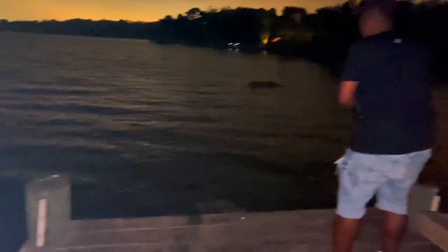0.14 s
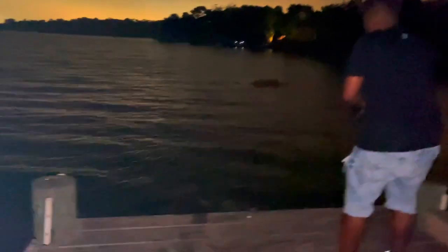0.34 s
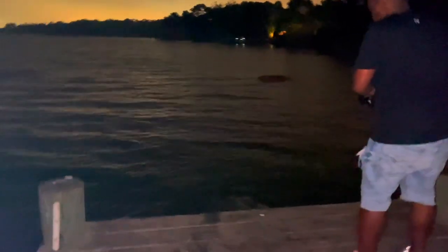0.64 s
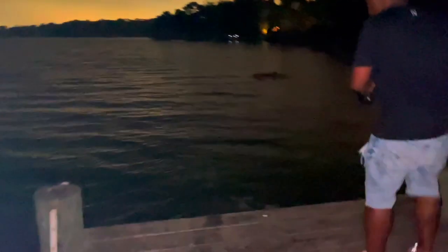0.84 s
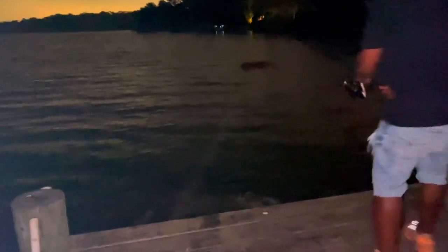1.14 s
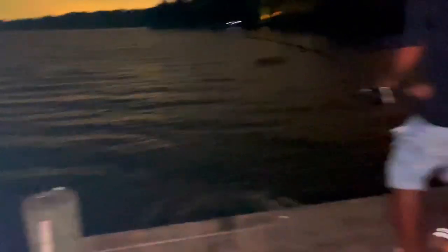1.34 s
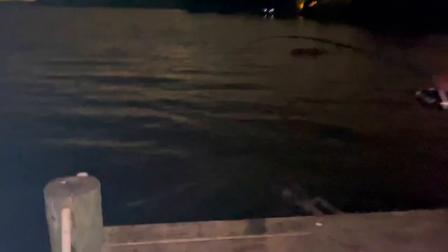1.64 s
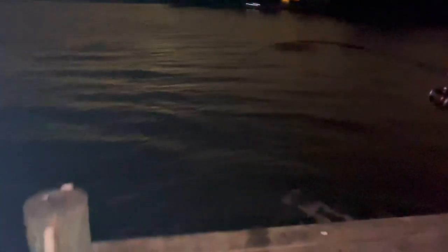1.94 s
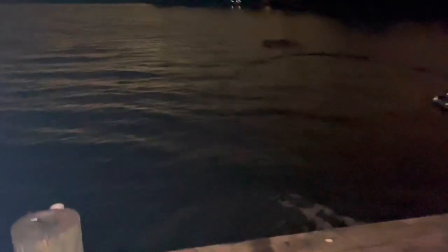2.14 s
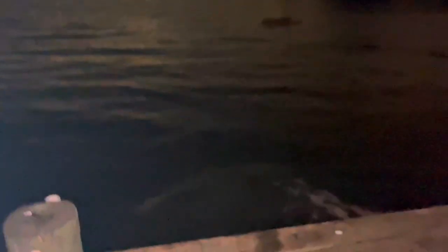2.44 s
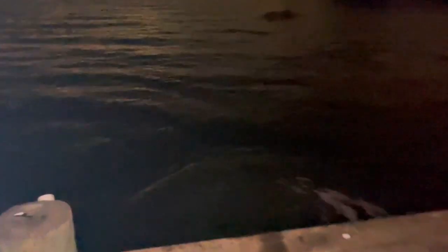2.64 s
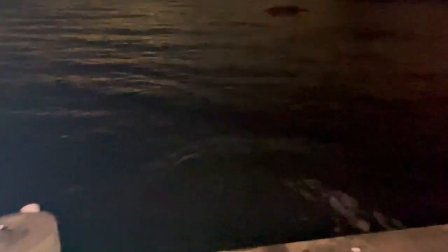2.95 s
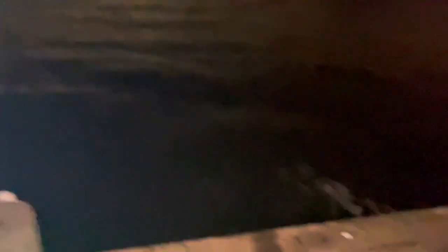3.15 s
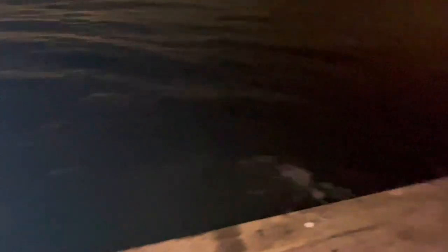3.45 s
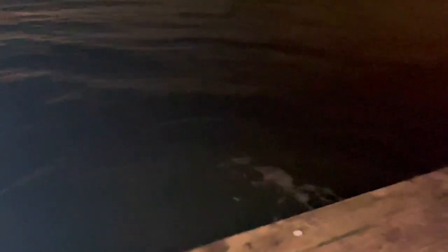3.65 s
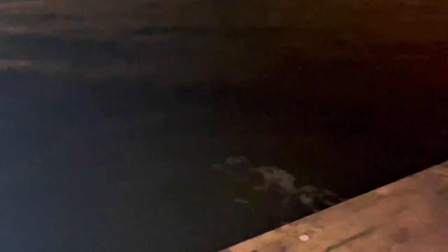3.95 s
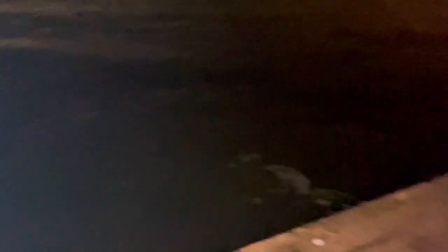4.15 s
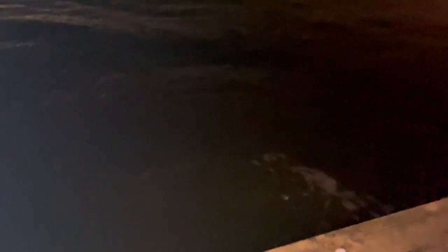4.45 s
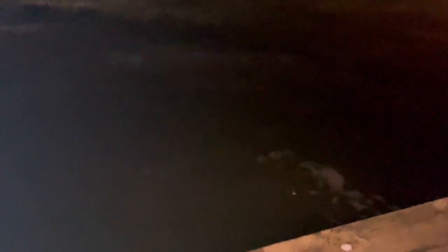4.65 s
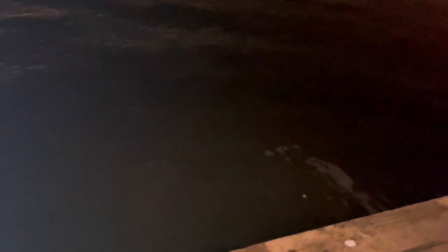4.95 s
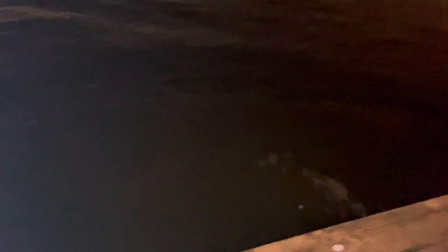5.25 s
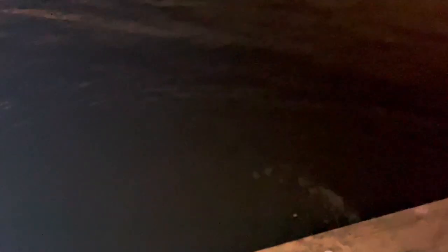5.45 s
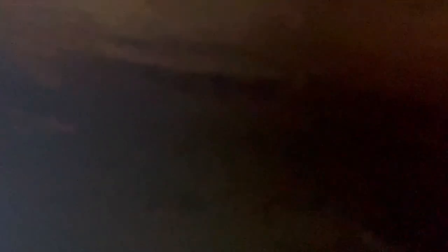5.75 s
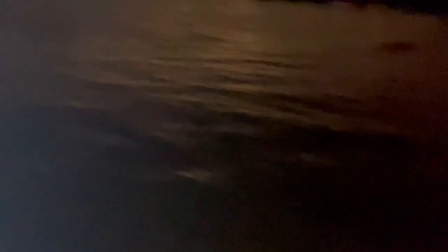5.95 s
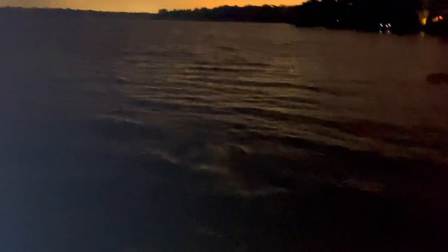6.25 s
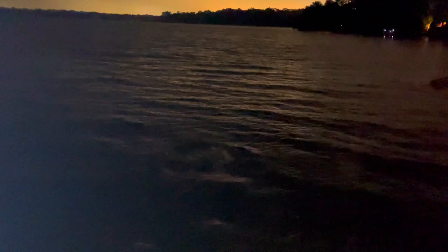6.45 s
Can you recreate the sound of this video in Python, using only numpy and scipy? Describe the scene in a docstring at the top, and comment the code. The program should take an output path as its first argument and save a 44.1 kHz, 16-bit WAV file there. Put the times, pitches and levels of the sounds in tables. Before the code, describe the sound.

Close outdoor sound on a wooden dock at dusk. A large fish thrashes at the surface with plops, gurgles, a flat smack and spray for about a second and a half. After a lull with plank taps, a reel clicks fast, hisses and whines, slowing to single ticks. A faint cricket and far traffic rumble sit behind. The fish splashes again briefly, then the hand bumps the handheld phone with low thuds and creaks.

```python
"""A hooked fish thrashes at the surface twice, beside a wooden dock at dusk: churning noise and ringing bubbles.
In between it pulls line off the reel: ratchet clicks ring the spool, slow to single ticks, line and drag hiss
and whine, and the taut line sings. Shaped noise makes far traffic, an engine, air and taps on the planks; a
modulated tone makes a cricket, falling tones make plops and knocks on the dock. Drops fall back, and the hand
bumps the phone, mostly near the end: low pulses, creaks and a dull scuff."""
import sys
import numpy as np
from scipy import signal
from scipy.fft import rfft, irfft, next_fast_len
from scipy.io import wavfile
from scipy.ndimage import uniform_filter1d, map_coordinates

SR = 44100
rng = np.random.default_rng(int(sys.argv[2]) if len(sys.argv) > 2 else 0)


def store_wav(level_fs):
    """Save 16-bit WAV to argv[1]."""
    pcm = np.round(np.clip(np.atleast_2d(level_fs), -1, 1) * 32767)
    wavfile.write(sys.argv[1], SR, pcm.T.astype(np.int16))


N = 291324
T = np.arange(N) / SR  # time of every sample, s


def amp(db):
    """Turn decibels into a plain gain."""
    return 10 ** (np.asarray(db) / 20)


def unit(x):
    """Scale a sound to an average (rms) level of 1."""
    return x / np.sqrt(np.mean(x ** 2) + 1e-20)


def along(points, hz):
    """Read a curve of (pitch_hz, value) points on a log pitch axis."""
    f, value = np.transpose(points)
    return np.interp(np.log(hz + 1), np.log(f + 1), value)


def gains(rows):
    """Turn (time_s, level_db) points into one gain per sample."""
    return amp(np.interp(T, *np.transpose(rows)))


def wobble(rate):
    """Make a smooth random curve with rate random points a second."""
    return map_coordinates(rng.standard_normal(int(N * rate / SR) + 4), [T * rate])


def held(start, end, fade):
    """Open a gate from start to end with soft edges, all in s."""
    return np.clip(np.minimum(T - start, end - T) / fade, 0, 1)


def filtered(x, response):
    """Multiply the spectrum of x by a complex response of frequency."""
    m = next_fast_len(N + 8192)
    return irfft(rfft(x, m) * response(np.fft.rfftfreq(m, 1 / SR)), m)[..., :N]


def resonances(modes):
    """Build the response of ringing (pitch_hz, width_hz, level_db) modes with alternating signs."""
    def response(f):
        total = 0
        for k, (centre, width, db) in enumerate(modes):
            peak = 1j * f * width / (centre * centre - f * f + 1j * f * width)
            total = total + (-1) ** k * amp(db) * peak
        return total
    return response


def rush(spectrum, spread, patchy_db):
    """Make two-port noise of rms 1 with random loud and soft patches; spread sets how much the ports differ."""
    z = signal.stft(rng.standard_normal((2, N)), nperseg=512)[2]
    field = rng.standard_normal(z.shape[1:])
    field = uniform_filter1d(uniform_filter1d(field, 6, 0), 4, 1)
    pair = signal.istft(z * amp(patchy_db * unit(field)), nperseg=512)[1][:, :N]
    mid, side = filtered(pair, lambda hz: amp(along(spectrum, hz)))
    return unit(np.array([mid + spread * side, mid - spread * side]))


def bubbles(s, db, hz, cycles, rise, size=1400):
    """Ring soft-starting, dying sines; the pitch climbs as a bubble nears the surface, or sinks if rise < 0."""
    t = np.arange(size)[None] / SR
    age = t * (hz / cycles)[:, None]
    swell = np.exp(-3 * age) * (1 - np.exp(-8 * age)) * (1 - t / t.max())
    wave = np.sin(2 * np.pi * hz[:, None] * t * (1 + rise * age / 2)) * swell
    at = (s * SR).astype(int)[:, None] + np.arange(size)
    return np.bincount(at.ravel(), (2 * amp(db)[:, None] * wave).ravel(), N + size)[:N]


def swarm(hz, spread, cycles, scatter_db, count, size):
    """Scatter many random bubbles over the whole scene, rms 1."""
    u = rng.random((count, 2))
    pitch = hz * np.exp(spread * rng.standard_normal(count))
    level_db = scatter_db * np.minimum(-np.log(u[:, 1]), 2.5)
    return unit(bubbles(u[:, 0] * T[-1], level_db, np.minimum(pitch, 11000), cycles, rise=0.32, size=size))


def clicks(s, gain):
    """Place sharp impulses, each followed by a weaker bounce 3.1 ms later."""
    x = np.bincount((np.asarray(s) * SR).astype(int), gain, N)
    return x + 0.39 * np.roll(x, int(0.0031 * SR))


# thrashes of the fish, and last a dull scuff of the hand:
# start_s, gurgle_db, slosh_db, spray_db, hold_s (levels relative, before mixing)
BURSTS = [(0, -41, -41.5, -48.5, 0.0073), (0.306, -34, -41, -52, 0.045), (0.359, -55, -33, -47.5, 0.016),
          (0.512, -45, -38.5, -55, 0.14), (0.644, -44.5, -45.5, -48.5, 0.33),
          (0.812, -48, -48.5, -43.5, 0.079), (0.885, -35.5, -42.5, -41.5, 0.066),
          (1.123, -42.5, -46.5, -45.5, 0.075), (1.295, -47.5, -47.5, -50.5, 0.19),
          (5.367, -57, -66, -44.5, 0.046), (5.388, -47, -44.5, -45, 0.083), (5.487, -41, -39.5, -44, 0.042),
          (5.753, -50.5, -60, -53.5, 0.12), (5.94, -60.5, -67, -54.5, 0.2), (6.399, -58.5, -45, -58, 0.043)]
ATTACK_S, CREST_FALL = 0.0013, 79  # rise of a burst; the crest then falls (dB per s)
WASH_DB, WASH_FALL = -8, (32, 123, 28.8)  # slower tail; its fall for gurgle, slosh, spray (dB per s)


def burst_gains():
    """Gains of gurgle, slosh and spray: each burst rises, holds, drops and leaves a slower tail; powers add."""
    power = 0
    for s, *db, hold in BURSTS:
        after = np.maximum(T - s - ATTACK_S - hold, 0)
        attack = np.clip((T - s) / ATTACK_S, 0, 1)
        crest = amp(-CREST_FALL * after)
        wash = amp(WASH_DB - np.outer(WASH_FALL, after))
        power = power + (amp(db)[:, None] * attack * (crest + wash)) ** 2
    return np.sqrt(power)


# tone of the low slosh, middle gurgle and fine spray: pitch_hz, level_db (per Hz)
SLOSH_TONE = [(100, -8), (200, 2.5), (430, 9.5), (800, -27), (1300, -40)]
GURGLE_TONE = [(350, -111), (600, 2), (1500, -6.5), (3500, -21.5), (6000, -44)]
SPRAY_TONE = [(1300, -6), (2200, 1), (4600, -10), (9200, -2), (10200, 1), (11100, -3), (12400, -61)]


def churn():
    """Torn water, and the last scuff: patchy noise plus swarms of large, middling and tiny bubbles."""
    gurgle, slosh, spray = burst_gains()
    large = swarm(372, 0.39, 5.5, scatter_db=2.5, count=1200, size=1400)
    low = slosh * (0.59 * rush(SLOSH_TONE, 0.13, patchy_db=4) + 0.5 * large)
    middling = swarm(1015, 0.508, 9.8, scatter_db=3.5, count=1000, size=1000)
    mid = gurgle * (0.4 * rush(GURGLE_TONE, 0.6, patchy_db=1.5) + 0.28 * middling)
    tiny = swarm(3930, 0.4, 1.34, scatter_db=1.5, count=4000, size=250)
    fizz = spray * (0.66 * rush(SPRAY_TONE, 0.15, patchy_db=4.5) + 0.32 * tiny)
    return low + mid + fizz


# big air pockets, and drops that fall back: start_s, level_db (roughly the peak), pitch_hz (at the start)
GULPS = [(0.019, -32.5, 390), (0.311, -28, 457), (0.394, -15.5, 331), (0.459, -26.5, 245),
         (0.568, -26.5, 247), (0.652, -33.5, 310), (0.956, -29, 394), (1.405, -29.5, 363),
         (1.555, -40, 390), (5.441, -29.5, 262), (5.513, -26, 298), (5.534, -31, 697), (5.7, -38, 700)]
DROPS = [(2.449, -50, 1000), (2.51, -52.5, 1410), (5.275, -49.5, 2300), (5.379, -35.5, 2200),
         (1.61, -48, 770)]


def gulps_and_drops():
    """Each trapped pocket of air rings once, its pitch rising slightly."""
    gulps = bubbles(*np.transpose(GULPS), 8.6, rise=0.012)
    drops = bubbles(*np.transpose(DROPS), 25.0, rise=0.041)
    return gulps + drops


# first sharp plops in the water, later short knocks on the dock:
# start_s, level_db (roughly the peak), pitch_hz (at the start)
KNOCKS = [(0.322, -19.5, 880), (0.356, -18.5, 810), (1.812, -37, 605), (1.916, -46, 1280),
          (1.936, -40.5, 1190), (4.122, -43.5, 1280), (6.148, -38, 1410)]


def plops_and_knocks():
    """Each plop or knock is a short ring that falls in pitch."""
    return bubbles(*np.transpose(KNOCKS), 5.25, rise=-0.77)


# loudness of the far traffic: time_s, level_db
RUMBLE = [(0, -45), (1.2, -40.5), (2.1, -47.5), (2.9, -43.5), (3.6, -39.5), (4.5, -43), (5.5, -39),
          (6.25, -38), (6.61, -29)]
# tone of the traffic and of the insects and air: pitch_hz, level_db (per Hz)
TRAFFIC_TONE = [(15, -85), (46, -2.5), (100, 0.5), (135, -6), (220, -16), (400, -39.5), (600, -99)]
AIR_TONE = [(150, -60), (250, -5), (600, -12.5), (1050, -15.5), (1300, -20), (4200, -24), (5900, -18.5),
            (6400, -28), (9100, -14), (9900, -13), (10200, -110)]


def night():
    """Shaped noise: far traffic, an engine drone that swells for a while, a slowly sinking hiss of insects and air."""
    traffic = gains(RUMBLE) * rush(TRAFFIC_TONE, 0.19, patchy_db=0.5)
    air = amp(-57.5 - 0.5 * T) * rush(AIR_TONE, 0.78, patchy_db=2.5)
    middle = filtered(air, lambda hz: (hz > 1100) & (hz < 4400))
    air = air - 0.5 * held(4.12, 5.6, 0.43) * middle  # quieter between 1100 and 4400 Hz from about 4.1 to 5.6 s
    drone = rush([(135, -43), (155, -0.5), (168, 4.5), (190, -56.5)], 0.3, patchy_db=3.0)
    engine = amp(-55.0 + 3.6 * (T - 2.5)) * held(1.6, 5.68, 0.45) * drone
    return traffic + engine + air


# the tail smacks the surface: start_s, level_db
SLAPS = [(0.897, -25)]
SLAP_T60 = 0.054  # time to fall by 60 dB, s


def slaps():
    """A flat smack is a short burst of broad noise."""
    burst = 0
    for s, db in SLAPS:
        rise = np.clip((T - s) / 0.0043, 0, 1)
        burst = burst + amp(db - 60 * np.maximum(T - s, 0) / SLAP_T60) * rise
    return burst * rush([(200, -33), (700, 2), (3000, -4), (12400, -30)], 0.52, patchy_db=5)


# cricket trills: start_s, end_s, level_db
CRICKET = [(1.8, 2.55, -76), (4.0, 4.4, -76), (4.4, 4.775, -69.5), (4.863, 5.4, -70)]


def cricket():
    """Each chirp falls from 5300 toward 4500 Hz, about 77 chirps a second with a wavering beat."""
    beat = (77 * T + 0.49 * wobble(2.3)) % 1
    phase = 2 * np.pi * np.cumsum(5300 - 800 * beat) / SR
    chirp = unit(np.sin(np.pi * beat) ** 2 * np.sin(phase + .4 * wobble(400)))
    return chirp * sum(amp(db) * held(start, end, 0.0083) for start, end, db in CRICKET)


# taps and scuffs on the planks: start_s, level_db (before the resonances), t60_s (time to fall by 60 dB)
TAPS = [(1.814, -42, 0.15), (2.625, -32, 0.11), (2.665, -36.5, 0.35), (3.296, -35.5, 0.37),
        (4.125, -31, 0.079)]
# resonances of a plank: pitch_hz, width_hz, level_db (for one pass; the sound passes twice)
PLANK = [(377, 1200, 3), (826, 1100, 6)]


def taps():
    """A dull contact is a puff of noise in the plank's resonances."""
    x, t = np.zeros(N), T[:6000]
    for s, db, t60 in TAPS:
        x[int(s * SR):][:t.size] += amp(db - 60 * t / t60) * rng.standard_normal(t.size)
    return filtered(x, lambda hz: resonances(PLANK)(hz) ** 2)


# strength of one spring snap: time_s, level_db (before turn swing and scatter)
SNAP = [(2.59, -12.5), (2.85, -11), (3.15, -11), (3.52, -9.5), (3.73, -13)]
# single ticks: start_s, level_db (relative)
TICKS = [(2.462, -18), (3.7364, -13), (3.7568, -13), (3.7846, -14.5), (3.8297, -16), (3.8738, -17.5),
         (3.913, -19), (3.9457, -19), (3.9852, -19.5), (4.378, -18), (4.472, -28)]
TURN_DB, TURN_TEETH = 3, 15  # swing of the snaps over a turn of the spool, each way; teeth in a turn


def ratchet(times):
    """A spring snaps over each tooth of a spool that runs out of true; each snap rattles briefly."""
    teeth = np.arange(times.size)
    turn = TURN_DB * np.cos(2 * np.pi * (teeth - teeth.size) / TURN_TEETH)
    force = amp(np.interp(times, *np.transpose(SNAP)) + turn + rng.standard_normal(teeth.size))
    tick_s, tick_db = np.transpose(TICKS)
    snaps = clicks(times, force) + clicks(tick_s, amp(tick_db + 4.5))
    rattle = 0.22 * rng.standard_normal(N) * np.convolve(snaps, amp(-60 * T[:400] / 0.022))[:N]
    return snaps + rattle


# resonances of spool and spring: pitch_hz, width_hz, level_db (average)
REEL_MODES = [(3376, 62, -11.5), (4360, 340, -14.5), (5785, 120, -10.5), (6613, 79, -2), (8170, 420, -3),
              (8900, 670, -2.5), (9840, 490, 2), (10835, 330, -1.5)]


def spool_ring(strikes):
    """Spool and spring ring at their own pitches; each level drifts at random, the four lowest most."""
    modes = filtered(strikes, lambda f: np.array([resonances([mode])(f) for mode in REEL_MODES]))
    ring = 0
    for k, mode in enumerate(modes):
        drift_db = (2.5 if k < 4 else 1) * wobble(14)
        ring = ring + (-1) ** k * amp(drift_db) * mode
    return ring


# pitch of the slipping drag's whine: time_s, pitch_hz
WHINE = [(2.63, 992), (2.685, 2010), (2.82, 2016), (2.89, 2245), (3.13, 1498), (3.38, 1076), (3.53, 980),
         (3.58, 783)]
WHINE_DB = -64  # rms over the whole scene


def drag_whine(rate):
    """The slipping drag whines in strands of narrow noise, and dies when the spool slows."""
    phase = 2 * np.pi * np.cumsum(np.interp(T, *np.transpose(WHINE))) / SR
    running = np.clip((rate - 62) / 15, 0, 1)
    rough = (1 + wobble(300)) * np.sin(phase + 1.2 * wobble(150))
    rough = rough + .5 * wobble(200) * np.sin(1.15 * phase)
    hum = wobble(200) * np.sin(2 * np.pi * 990 * T)
    rough = rough + (rate > 170) * hum  # at full speed the frame hums along
    low, high = resonances([(1030, 200, -3)]), resonances([(2150, 550, 5)])
    return amp(WHINE_DB) * unit(filtered(running * rough, lambda hz: low(hz) + high(hz)))


HISS_DB, HISS_GROWS = -46.5, 1.6  # level at 150 teeth per s, before the jerks; power of the speed it follows


def line_hiss(rate, angle):
    """The running line hisses louder with speed and jerks once a tooth."""
    loudness = amp(HISS_DB) * uniform_filter1d((rate / 150) ** HISS_GROWS, size=3000)
    hiss = rush([(600, -19.5), (2400, -3.0), (5200, -5), (12400, -6)], 0.97, patchy_db=2.0)
    return loudness * hiss * (1 + np.cos(2 * np.pi * angle) / 2)


# spool speed while the line runs: time_s, speed_teeth_per_s
SPOOL = [(2.59, 82), (2.66, 141.7), (2.7, 198.8), (2.81, 173.9), (2.89, 209.7), (3.02, 157.3),
         (3.19, 118.3), (3.3, 127), (3.5, 86.8), (3.61, 64.4), (3.73, 63.9)]


def reel():
    """The spool speed times the snaps, drives the hiss and stops the whine when slow."""
    s, speed = np.transpose(SPOOL)
    rate = np.interp(T, s, speed, 0, 0)
    angle = np.cumsum(rate) / SR  # counted in teeth
    teeth = np.arange(int(angle[-1]) + 1)
    times = s[0] + np.interp(teeth, angle[rate > 0], T[rate > 0] - s[0])
    return spool_ring(ratchet(times)) + drag_whine(rate) + line_hiss(rate, angle)


# bumps on the phone: start_s, level_db (roughly the peak, before scatter), pitch_hz (at the start)
BUMPS = [(3.292, -27, 52.3), (3.39, -28, 56.5), (6.122, -20, 100), (6.276, -26, 90), (6.334, -14.5, 292),
         (6.347, -17.5, 193), (6.363, -13.5, 83), (6.46, -19, 208), (6.47, -14.5, 67), (6.488, -15.5, 201),
         (6.504, -16.5, 68.4), (6.572, -13, 97), (6.592, -9, 125)]
# creaks of the phone case: start_s, level_db (relative)
CRACKLE = [(6.4042, -42), (6.41, -40), (6.5603, -44)]
UNEVEN_DB, LEFT_LATE_S = 2, 0.00094  # greatest level shift at either port; the left one feels a bump later


def hand():
    """The hand bumps the phone: low pushes that sink in pitch, unequal at the two ports, and small dry creaks."""
    faint = rng.random((40, 3))  # fainter creaks of varied pitch, scattered from 6.2 s on
    specks = bubbles(6.2 + .4 * faint[:, 0], -46 - 12 * faint[:, 1], 1500 * 6 ** faint[:, 2], 11,
                     rise=0, size=300)
    s, db = np.transpose(CRACKLE)
    case = resonances([(4940, 2100, 0.0), (9490, 630, 17.0)])
    creaks = filtered(clicks(s, amp(db + 15.0)), case)
    s, db, hz = np.transpose(BUMPS)
    louder = rng.uniform(-0.64, 1, s.size)
    ports = []
    for side in (1, -1):  # left, right
        late, shift_db = side * LEFT_LATE_S / 2, side * UNEVEN_DB * louder
        ports.append(bubbles(s + late, db + shift_db, hz, 4.6, rise=-0.41, size=3500))
    return np.array(ports) + creaks + specks


# song of the taut line: start_s, end_s, pitch_hz, level_db (at the start, before fading)
LINE_SONG = [(3.33, 3.936, 2396, -53.5)]


def line_song():
    """The taut line sings at 2.4 kHz through the rod guides, slightly rough and fading 32 dB per s."""
    song = 0
    for start, end, hz, db in LINE_SONG:
        tone = np.sin(2 * np.pi * hz * T + .5 * wobble(110))
        song = song + amp(db - 32 * (T - start)) * held(start, end, 0.11) * tone
    return song


def scene():
    """Add all the sources together."""
    splashes = churn() + gulps_and_drops() + plops_and_knocks()
    return splashes + night() + slaps() + cricket() + taps() + reel() + hand() + line_song()


# lead of the left port: pitch_hz, lead_radians
PORT_LEAD = [(30, -.3), (600, .3), (3100, 1), (7600, 1), (8800, -.3), (9800, -2.8), (10900, -3.7),
             (11600, -6.3)]
# left level minus right level: pitch_hz, difference_db
LEFT_LOUDER = [(60, 0.5), (300, 0.5), (700, 2.5), (11800, 1)]
TOP_HZ = 12400  # band limit


def record(dry):
    """The two ports hear each pitch at their own level and phase; nothing is kept from the band limit up."""
    def ports(hz):
        half = amp(along(LEFT_LOUDER, hz) / 2) * np.exp(.5j * along(PORT_LEAD, hz))
        return np.array([half, 1 / half]) * (hz < TOP_HZ)
    return filtered(dry, ports)


dry = scene()
out = record(dry)
store_wav(out)
```